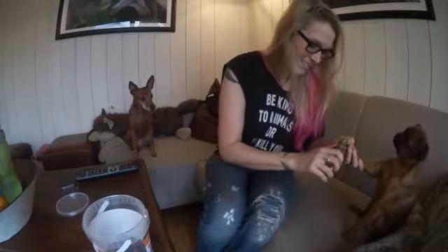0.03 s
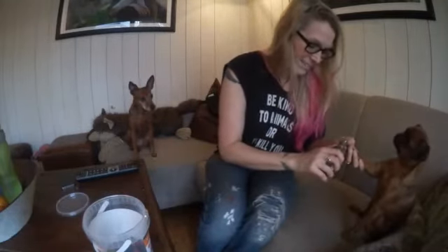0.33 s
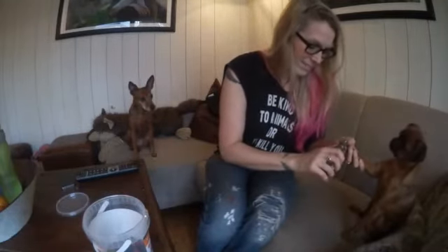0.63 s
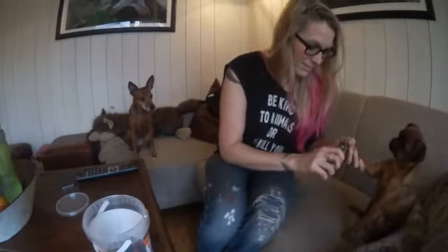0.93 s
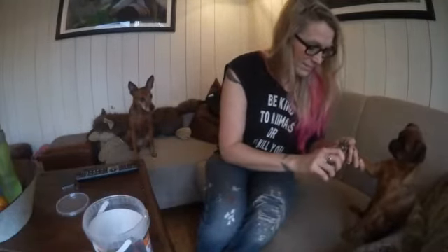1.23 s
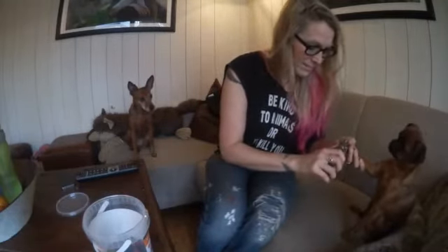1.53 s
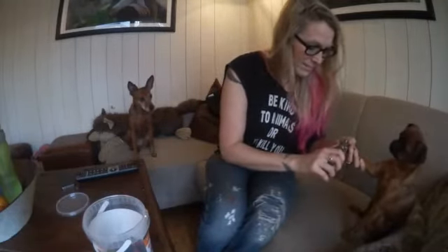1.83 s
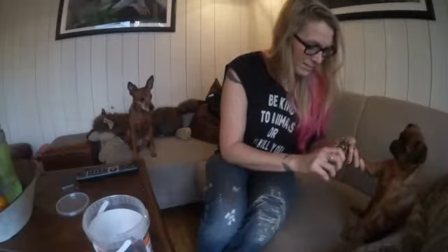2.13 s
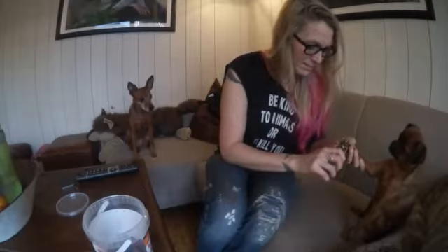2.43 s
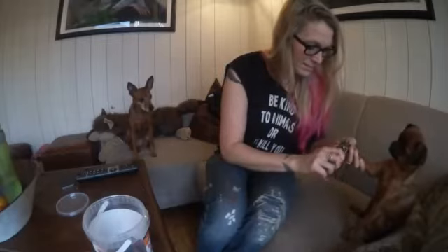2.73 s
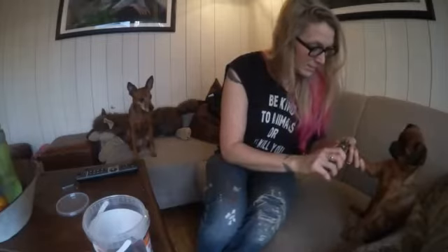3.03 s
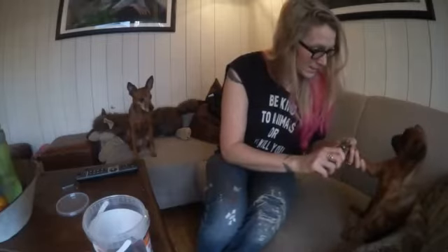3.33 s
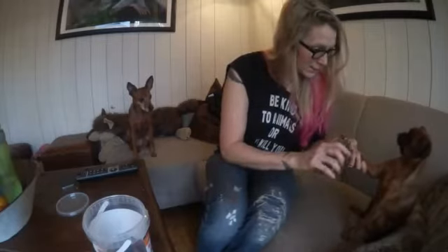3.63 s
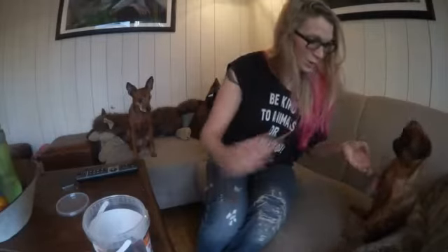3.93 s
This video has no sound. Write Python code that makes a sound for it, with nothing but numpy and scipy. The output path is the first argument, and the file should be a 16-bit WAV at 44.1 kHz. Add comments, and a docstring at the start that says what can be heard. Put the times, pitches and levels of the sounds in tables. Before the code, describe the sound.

Nail clippers cut a dog's claw in a quiet living room. Faint hiss and a pulsing appliance hum run throughout, with a tiny rustle at the start. From about 2.8 to 3.4 seconds the clippers give a few light clicks and thin ticks, slightly to the right. At 3.6 seconds comes one sharp, bright snap with a short room echo. Two soft, dull bumps follow at 3.7 and 3.9 seconds.

```python
"""Faint hiss and the beating hum of an appliance fill a quiet furnished living room, with one brief rustle.
Nail clippers, held a little to the right, click lightly as their handles are squeezed. Then the blade
cuts through a dog's claw with one sharp snap, and two soft bumps follow. Each click and the snap excite
the damped modes of the tool, and the room prolongs them as diffuse reverberation."""
import sys
import numpy as np
from scipy import signal
from scipy.fft import rfft, irfft
from scipy.io import wavfile

SR = 44100
rng = np.random.default_rng(int(sys.argv[2]) if len(sys.argv) > 2 else 0)


def transcribe(u):
    """Save the signal u as a 16-bit wav file named by the first command-line argument.

    u: samples, shape (n,) or (channels, n), limited to [-1, 1]; the rate is SR.
    q: integer samples, one column per channel.
    """
    v = np.clip(np.atleast_2d(u).T, -1, 1)
    q = np.round(v * 32767).astype(np.int16)
    wavfile.write(sys.argv[1], SR, q)


N = 176400
TIME = np.arange(N) / SR
BINS_HZ = np.maximum(np.arange(N // 2 + 1) * SR / N, 1)

# Spectrum of the hiss. Each row: frequency in Hz, relative spectral density in dB.
HISS_SPECTRUM = [(15, -34), (28, -13), (76, -13.5), (125, -6.5), (190, -7.5), (290, -7.5), (480, -11),
                 (800, -12), (1400, -14), (2900, -15.5), (7000, -20), (11700, -26), (15800, -32)]
# Likeness of the hiss at the two ears. Each row: frequency in Hz, correlation from 0 to 1.
HISS_COHERENCE = [(60, 0.76), (120, .8), (200, 0.65), (380, 0.13), (700, 0.067), (1300, 0.12), (2400, 0.49),
                  (8000, .58), (15000, 0.92)]
# Hum of the appliance motor. Each row: multiple of the turning rate, rms level in dB.
MOTOR_HARMONICS = [(1, -84.5), (2, -74.5), (12, -87), (13, -78.5), (14, -89), (16, -77), (17, -80.5),
                   (19, -85.5), (55, -83), (56, -89), (59, -79.5)]
# Reverberation of the room. Each row: frequency in Hz, gain in dB, time to fall 60 dB in seconds.
ROOM_BANDS = [(300, -4, 0.41), (600, -6, 0.24), (900, -1, 0.18), (1300, -10.5, 0.36), (2300, -2.5, 0.31),
              (2870, -12, 0.3), (3670, -4, 0.31), (4700, -3, 0.18), (6000, -3.5, 0.35), (7500, -8, 0.24),
              (12000, -7, 0.21)]
# Soft bumps. Each row: start in seconds, level in dB, upper band edge in Hz, decay time in seconds.
SOFA_BUMPS = [(3.677, -52.5, 750, 0.016), (3.905, -52.5, 190, 0.028)]
# Ticks of the blade against the claw. Each row: start in seconds, level in dB.
BLADE_TICKS = [(3.1235, -55), (3.1722, -50), (3.442, -52.5)]
# Clicks of the handles. Each row: start in seconds, level in dB.
HANDLE_CLICKS = [(2.7946, -37), (3.0725, -35.5), (3.3262, -35), (3.3548, -45.5), (3.4405, -51.5)]
# Modes of the clippers. Each row: frequency in Hz, time to fall 60 dB at unit damping in seconds,
# relative level in a click in dB, relative level in the snap in dB, left minus right level in dB.
CLIPPER_MODES = [ (338, 0.015, -36, -26, 0), (589, 0.023, -40, -22, 1), (1231, 0.022, -7, -4.5, -5),
                 (1413, 0.0087, -15.5, -4, -5), (2250, .012, -1, -1.5, -4.5), (2470, 0.018, -12, -4, -4),
                 (2787, 0.015, -12, 1.5, -3), (3660, 0.011, -5.5, -9, -8), (4700, .012, 1, -15, 4),
                 (5660, 0.031, -23, -21.5, -7), (6220, 0.019, -25, -23, 2), (7450, 0.014, -9, -49, 0),
                 (8900, 0.008, -26, -38, 2), (11400, .007, -31, -30.5, 18), (13200, .008, -26, -35, 1)]

SNAP_S, SNAP_DB = 3.6017, -10
CLICK_ATTACK_S, SNAP_ATTACK_S = 0.00077, 0.00022


def from_db(db):
    """Amplitude grows tenfold for every 20 dB."""
    return 10 ** (np.asarray(db) / 20)


def rms_one(x):
    """Dividing by the rms gives a signal unit power."""
    return x / np.sqrt(np.mean(x ** 2) + 1e-20)


def at_hz(points, hz, column=1):
    """Interpolation along log frequency turns a table column into a curve."""
    rows = np.array(points)
    return np.interp(np.log(hz), np.log(rows[:, 0]), rows[:, column])


def band_noise(low_hz, high_hz):
    """Band-pass filtering confines white noise between two edges; the result has unit power."""
    sos = signal.butter(2, [low_hz, high_hz], "band", fs=SR, output="sos")
    return rms_one(signal.sosfilt(sos, rng.standard_normal(N)))


def envelope(start_s, attack_s, decay_s):
    """A damped vibration builds up, then decays exponentially."""
    age = np.maximum(TIME - start_s, 0)
    return (1 - np.exp(-age / attack_s)) * np.exp(-np.minimum(age / decay_s, 40))


def stereo_pair(mid, side, coherence):
    """The weighted sum and difference of two independent noises have a chosen coherence."""
    return np.sqrt(1 + coherence) * mid + np.sqrt(1 - coherence) * side * [[1], [-1]]


def hiss():
    """Steady room and microphone noise is partly coherent between the ears, least in the midrange."""
    level_db, pan_db = -61, 0.6
    white = stereo_pair(*rfft(rng.standard_normal((2, N))), at_hz(HISS_COHERENCE, BINS_HZ))
    gains = from_db([[level_db + pan_db / 2], [level_db - pan_db / 2]])
    return gains * rms_one(irfft(white * from_db(at_hz(HISS_SPECTRUM, BINS_HZ)), N))


def appliance():
    """Close frequencies beat: a second motor against one motor's second harmonic, under a thin whine."""
    motor_hz, wander_hz, wander_corner_hz = 49, 0.03, 2.56
    beat_hz, swell_s = 7.9, 0.322
    wander = rms_one(irfft(rfft(rng.standard_normal(N)) / (1 + (BINS_HZ / wander_corner_hz) ** 2), N))
    angle = 2 * np.pi * np.cumsum(motor_hz + wander_hz * wander) / SR
    phases = [multiple * angle + rng.uniform(0, 2 * np.pi) for multiple, _ in MOTOR_HARMONICS]
    first_motor = sum(from_db(db) * np.sin(phase) for (_, db), phase in zip(MOTOR_HARMONICS, phases))
    second_motor = from_db(-75.5) * np.sin(phases[1] - 2 * np.pi * beat_hz * (TIME - swell_s))
    whine = from_db(-83.5) * band_noise(2800, 2980)
    return np.sqrt(2) * (first_motor + second_motor) + whine


def room(direct):
    """Reflections merge into a diffuse field in which each band decays at its own exponential rate."""
    delay_s, build_s = 0.0036, 0.00098
    t = TIME[:SR // 2]
    white = stereo_pair(*rfft(rng.standard_normal((2, len(t)))), coherence=0.57)
    hz = np.arange(white.shape[1]) * SR / len(t)
    onset = 1 - np.exp(-np.maximum(t - delay_s, 0) / build_s)
    edges_hz = np.geomspace(150, 16000, 21)
    response = 0
    for low, high in zip(edges_hz, edges_hz[1:]):
        centre = np.sqrt(low * high)
        band = irfft(white * ((hz >= low) & (hz < high)), len(t))
        decay = np.exp(-np.log(1000) * t / at_hz(ROOM_BANDS, centre, column=2))
        unit_gain_tail = rms_one(band * decay * onset) * np.sqrt(2 * (high - low) / SR / len(t))
        response += from_db(at_hz(ROOM_BANDS, centre)) * unit_gain_tail
    return signal.fftconvolve(direct.mean(axis=0)[None], response, axes=1)[:, :N]


def rustle():
    """Friction in handling gives one faint, brief swell of midrange noise."""
    return from_db(-62) * band_noise(600, 1900) * envelope(0.125, attack_s=0.03, decay_s=0.04)


def bumps():
    """Soft contact excites mainly low frequencies, so movements on the sofa after the cut sound dull."""
    return sum(from_db(db) * band_noise(99, high_hz) * envelope(start, attack_s=0.003, decay_s=decay)
               for start, db, high_hz, decay in SOFA_BUMPS)


def blade_ticks():
    """Brief contact excites high frequencies: the blade settles on the claw with thin, dry ticks."""
    pulses = sum(from_db(db) * envelope(start, CLICK_ATTACK_S, decay_s=0.0023)
                 for start, db in BLADE_TICKS)
    return band_noise(3500, 10900) * pulses


def clipper_ring(start_s, levels_db, attack_s, damping):
    """A blow excites damped modes; time and level differences between the ears place them to the right."""
    left_lag_s, treble_lag_rad = 0.00003, 0.45
    age = TIME - start_s - np.array([[left_lag_s], [0]])
    ring = np.zeros((2, N))
    for k, ((hz, t60, _, _, pan_db), db) in enumerate(zip(CLIPPER_MODES, levels_db)):
        phase_lag = np.array([[treble_lag_rad * (hz > 4000)], [0]])
        decay_s = t60 / damping / np.log(1000)
        tone = np.sin(2 * np.pi * hz * age - phase_lag) * envelope(start_s, attack_s, decay_s)
        gains = from_db([[db + pan_db / 2], [db - pan_db / 2]])
        ring += (-1) ** k * gains * tone  # neighbouring modes start in opposite polarity
    return ring


def handle_clicks():
    """Light impacts in the squeezed handles excite the same modes in varying shares, with some grit."""
    spread_db = 2.7
    mode_db = np.array(CLIPPER_MODES)[:, 2]
    scatter_db = spread_db * rng.standard_normal((len(HANDLE_CLICKS), len(mode_db)))
    grit = from_db(-15.5) * band_noise(3000, 13600)
    clicks = np.zeros((2, N))
    for (start, db), scatter in zip(HANDLE_CLICKS, scatter_db):
        clicks += clipper_ring(start, db + mode_db + scatter, CLICK_ATTACK_S, damping=0.91)
        clicks += from_db(db) * grit * envelope(start, CLICK_ATTACK_S, decay_s=0.0032)
    return clicks


def splinter():
    """Rapid fracture radiates high treble: the splitting claw gives the snap a bright, dry edge."""
    return from_db(-37.5) * band_noise(8400, 17000) * envelope(SNAP_S, SNAP_ATTACK_S, decay_s=0.0029)


def snap():
    """Stored elastic energy is released: the strained claw creaks, cracks, and the jaws slam shut."""
    lead_s = 0.0056
    creak = from_db(-44) * band_noise(2290, 3300) * envelope(SNAP_S - lead_s, CLICK_ATTACK_S, lead_s)
    crack = band_noise(1600, 5000) * envelope(SNAP_S, SNAP_ATTACK_S, decay_s=0.0017)
    mode_db = np.array(CLIPPER_MODES)[:, 3]
    jaws = clipper_ring(SNAP_S, SNAP_DB + mode_db, SNAP_ATTACK_S, damping=0.84)
    blow = creak + from_db(SNAP_DB - 13) * crack + jaws
    bass_cut = signal.butter(4, 250, "high", fs=SR, output="sos")  # a small tool radiates little bass
    return signal.sosfilt(bass_cut, blow + 1e-18)


def scene():
    """By superposition, the clippers' direct sound, its reverberation and the background add."""
    light = handle_clicks() + blade_ticks()
    cut = snap()
    reverberation = room(from_db(-3) * light + from_db(-1) * cut)
    return light + cut + splinter() + reverberation + rustle() + bumps() + hiss() + appliance()


def record(dry):
    """A steep low-pass filter limits the bandwidth, removing the highest treble."""
    cutoff_hz = 15600
    return irfft(rfft(dry) / np.sqrt(1 + (BINS_HZ / cutoff_hz) ** 200), N)


dry = scene()
out = record(dry)
transcribe(out)
```